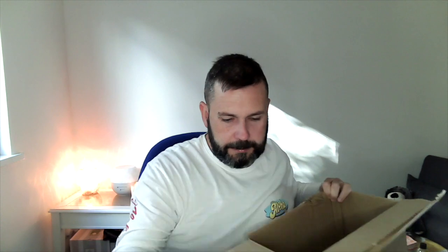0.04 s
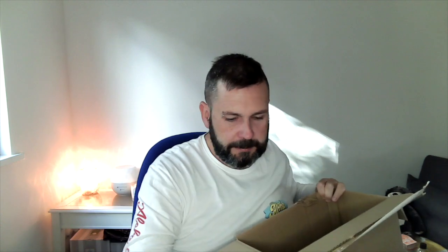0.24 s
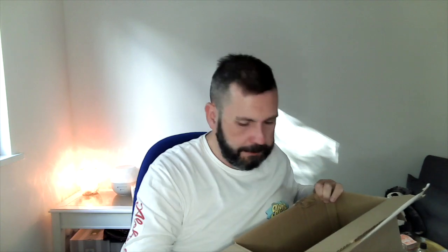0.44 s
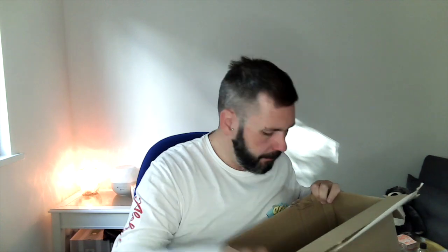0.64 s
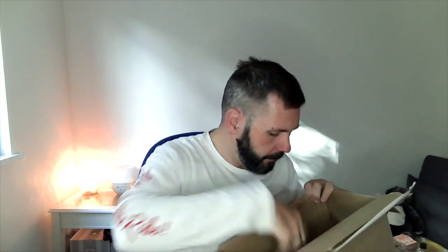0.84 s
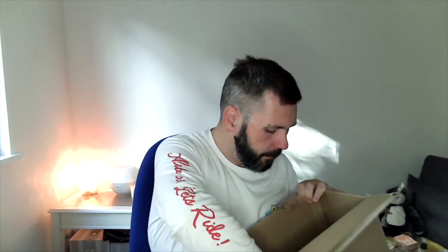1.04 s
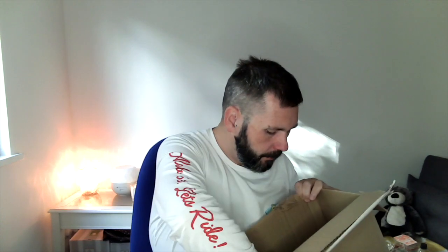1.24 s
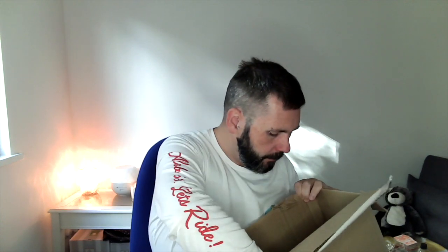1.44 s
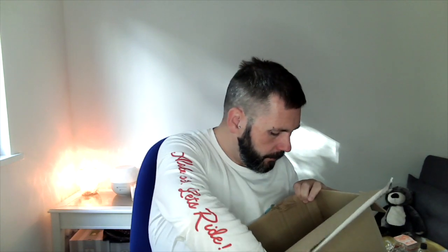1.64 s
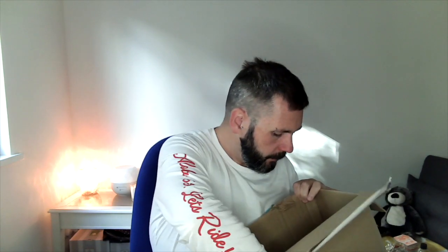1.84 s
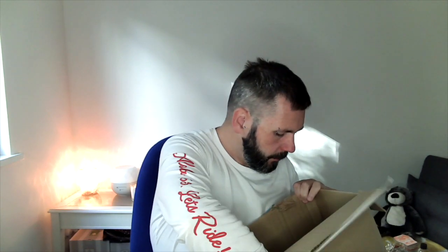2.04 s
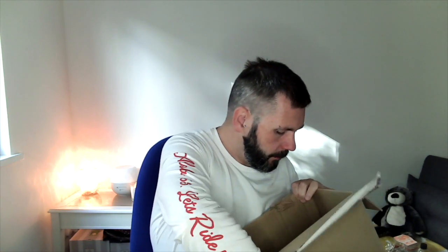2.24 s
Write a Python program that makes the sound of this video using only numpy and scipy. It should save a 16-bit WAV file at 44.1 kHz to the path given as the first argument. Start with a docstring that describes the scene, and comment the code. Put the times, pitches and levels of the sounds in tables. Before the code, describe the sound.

Cardboard box rummaging with rustling packing paper, dull thumps and two early knocks, small room

```python
"""In a small room, two knocks sound on a desk, amid box bumps and rustling paper that begin before them.
Knocks are decaying desk modes under a noise clatter and tick; paper is bursts of random clicks.
Bumps excite the modes of the cardboard box and scuffing noise; a narrow resonance squeaks once.
A low boom and a low hum are narrow-band noise on level curves, over a steady noise floor.
The knocks, paper and bumps gain a diffuse tail that decays at its own speed in each band."""
import sys
import numpy as np
from scipy import signal
from scipy.fft import rfft, irfft
from scipy.io import wavfile
from scipy.ndimage import uniform_filter1d

SR = 44100
rng = np.random.default_rng(int(sys.argv[2]) if len(sys.argv) > 2 else 0)


def generate_wav(sig):
    """Save sig (samples, or channels by samples) to the path in sys.argv[1] as 16-bit PCM at SR."""
    pcm = np.round(np.clip(np.atleast_2d(sig).T, -1, 1) * 32767).astype(np.int16)
    wavfile.write(sys.argv[1], SR, pcm)


N = 101429
TIME = np.arange(N) / SR
HZ = np.fft.rfftfreq(2 * N, 1 / SR)  # bins of the zero-padded transform

# Noise floor spectrum: (frequency [Hz], relative level [dB])
FLOOR_SPECTRUM = [(20, -2), (60, -5), (130, -9), (300, -12), (500, -26), (1000, -31), (3000, -31),
                  (7000, -27.5), (10000, -33), (15000, -47)]
FLOOR_DB = -57

# Level curve of the low hum: (time [s], level [dB])
HUM_LEVELS = [(0, -43), (.11, -40.5), (.16, -47), (.21, -68), (.55, -52), (.66, -70), (.71, -58),
              (.83, -63.5), (.9, -71.5), (2.3, -77)]
HUM_HZ, HUM_WIDTH_HZ = 138, 6.8

# Low boom near 67 Hz, bass tail of the second knock, then the hollow box: (time [s], level [dB])
BOOM_LEVELS = [(0, -48), (.15, -62), (.385, -57), (.415, -39), (.48, -51), (.6, -63.5), (.92, -68),
               (1.0, -58), (1.08, -39.5), (1.2, -51.5), (1.35, -36.5), (1.49, -48), (1.56, -41),
               (1.72, -47), (1.85, -66), (1.93, -56.5), (2.0, -37), (2.12, -47.5), (2.3, -57)]
BOOM_HZ, BOOM_WIDTH_HZ = 67.3, 9.1

SQUEAK_START_S, SQUEAK_RISE_S, SQUEAK_FADE_S = 0.612, 0.02, 0.046  # fade: time to fall 20 dB
SQUEAK_HZ, SQUEAK_WIDTH_HZ, SQUEAK_DB = 647, 15, -51

# Bumps on the box; a fall time under 0.001 s acts as 0.001 s:
# (time [s], level before the ring and scuff trims [dB], rise [s], time to fall 20 dB [s],
#  contact corner [Hz])
BUMPS = [(0.0, -38.5, 0.0082, 0.18, 600), (0.695, -53, .015, .15, 380), (0.94, -42, 0.0058, 0.02, 270),
         (0.971, -35.5, 0.013, 0.08, 276), (0.993, -26, .007, 0.04, 210), (1.114, -39.5, 0.0075, 0.2, 313),
         (1.213, -35.5, 0.0092, 0.08, 375), (1.316, -40.5, 0.0087, 0.37, 270),
         (1.395, -36.5, 0.028, -0.4, 280), (1.526, -38.5, 0.0037, 0.1, 337),
         (1.556, -34, 0.0043, -0.03, 300), (1.624, -38, 0.0037, 0.12, 604), (1.643, -31, 0.0046, 0.04, 380),
         (1.734, -35.5, 0.023, 0.44, 296), (1.771, -28, 0.016, -0.05, 270),
         (1.818, -28.5, 0.015, 0.0749, 650), (1.965, -22, 0.014, .06, 265), (2.022, -29, 0.0046, 0.04, 460)]
# Modes of the cardboard walls and the air inside: (frequency [Hz], level [dB], time to fall 60 dB [s])
BOX_MODES = [(67.3, -11, 0.5), (128.5, 1, 0.32), (186.5, -3.5, 0.24), (254, -4, 0.12), (293.3, -4, .13),
             (342, -23, 0.16), (443, -12.5, 0.2), (689.3, -4.5, 0.12)]
# Spectrum of scuffing along the walls: (frequency [Hz], relative level [dB])
SCUFF_SPECTRUM = [(25, -25), (50, -16), (68, 0), (95, -10), (130, 1.5), (180, -3), (280, -2), (420, -9),
                  (560, -14), (900, -9.5), (3000, -40.5)]
BOX_RING_DB, SCUFF_DB, BOX_ROOM_DB = -2, -2, -13

# Knocks on the desk:
# (time [s], mode level [dB], contact corner [Hz], clatter level [dB], tick level [dB],
#  extra level of the low modes [dB])
KNOCKS = [(0.2002, -9, 520, -19.5, -41, 7), (0.3965, .5, 2800, -14.5, -34, -5)]
# Modes of desk and object: (frequency [Hz], level [dB], time to fall 60 dB [s])
DESK_MODES = [(131.6, -19, .15), (257.7, -25, .08), (323.6, -18.5, 0.12), (457, -18, 0.094),
              (522.5, -12.5, 0.11), (689, -17, .06), (738, -12.5, .1), (880, -25, .07), (1096, -31.5, .09),
              (1253, -32, .1), (1468, -31, .1), (1542, -29, .1), (2124, -31.5, .09), (2247, -27.5, .08)]
# Clatter spectrum before the contact softens it: (frequency [Hz], relative level [dB])
CLATTER_SPECTRUM = [(40, -17), (90, 4.5), (190, -5), (290, 2), (420, -1.5), (720, -4), (1000, -13.5),
                    (1600, -13), (1850, -22), (2250, -16.5), (2700, -26), (3400, -19), (4500, -28.5),
                    (12000, -61)]
LOW_MODES_HZ, KNOCK_RISE_S, KNOCK_ROOM_DB = 400, 0.0028, -12
CLATTER_FADE_S, TICK_FADE_S = 0.042, 0.025  # times to fall 20 dB

# Bursts of crumpling paper; a fall time under 0.001 s acts as 0.001 s:
# (start [s], rise [s], time to fall 20 dB [s], crisp level [dB], crinkle level [dB], dull level [dB])
CRUMPLES = [(0.0, 0.0017, 0.09, -50, -62, -52.5), (0.03, 0.01, 0.9, -67, -68.5, -64.5),
            (0.139, 0.096, 0.27, -51, -54, -68), (0.24, .05, 0.38, -54, -64, -59),
            (0.315, 0.024, 0.16, -47.5, -51.5, -49), (0.576, .028, 0.12, -49.5, -72, -61),
            (0.606, 0.025, 0.0259, -40.5, -66, -50.5), (0.701, 0.063, -0.02, -61, -84, -67.5),
            (0.768, 0.02, 0.02, -49, -57, -50), (0.796, 0.0209, -0.1, -53, -61.5, -55),
            (0.933, 0.0055, 0.08, -39.5, -49, -47), (0.981, 0.017, -0.0056, -51, -54, -41.5),
            (1.017, .005, 0.0546, -45.5, -48, -45.5), (1.11, 0.0081, 0.3, -52.5, -57, -55.5),
            (1.15, .01, -0.22, -47, -59, -42), (1.216, 0.015, 0, -54, -53, -49),
            (1.248, 0.0033, 0.5, -56.5, -60.5, -58), (1.31, 0.0095, 0.06, -52.5, -53, -45),
            (1.358, 0.024, 0.09, -46, -52, -45), (1.524, 0.002, 0.12, -48, -55, -48.5),
            (1.56, .005, 0.13, -53, -68, -52.5), (1.625, 0.00084, 0.12, -49, -60, -43),
            (1.65, 0.017, -0.13, -47.5, -54, -48), (1.729, 0.0044, 0.0645, -33.5, -39, -39),
            (1.759, 0.0044, -0.04, -38, -47, -40), (1.809, 0.0076, 0.16, -65, -58, -44),
            (1.8367, 0.00085, 0.0552, -29, -35, -35.5), (1.953, .002, .07, -41, -45, -41),
            (2.001, 0.0067, 0.105, -39.5, -43.5, -46.5), (2.071, 0.0069, 0.2, -53.5, -55, -46.5),
            (2.174, 0.016, 2, -48, -52.5, -57.5), (2.218, 0.031, 1, -43, -44, -41.5)]
# Spectrum of small snapping creases, also used for the ticks: (frequency [Hz], relative level [dB])
CRISP_SPECTRUM = [(300, -47), (1500, -19.5), (2800, -15), (4200, -4.5), (5200, -0.5), (6500, 0.5),
                  (8300, -4), (10000, -7), (11500, -17), (13000, -35), (16000, -48)]
# Spectrum of larger crinkling creases: (frequency [Hz], relative level [dB])
CRINKLE_SPECTRUM = [(300, -39.5), (1400, -14), (2200, -1.5), (2800, -0.5), (3400, 1), (4200, -6.5),
                    (6000, -15), (12000, -43.5)]
# Spectrum of big, dull folds: (frequency [Hz], relative level [dB])
DULL_SPECTRUM = [(100, -16.5), (400, 0), (560, -6.5), (700, 2.5), (900, -4.5), (1150, 2), (1550, -3),
                 (1850, -5), (2250, -7.5), (2800, -19.5), (4500, -27), (12000, -49.5)]
CREASES_PER_S, CREASE_SPREAD_DB, PAPER_ROOM_DB = 2200, 4.2, 0.5
PATCH_DB, PATCH_HZ, PATCH_S = 2.5, 750, 0.035  # rms depth, width and duration of the colour patches

# Reverberation of the room: (frequency [Hz], time to fall 60 dB [s])
ROOM_T60 = [(100, 0.31), (500, 0.27), (1500, 0.28), (4000, 0.33), (8000, 0.27), (14000, 0.087)]
# Likeness of the two channels: (frequency [Hz], left-right correlation [-1 to 1])
ROOM_LIKENESS = [(100, 0.99), (500, 0.96), (1000, 0.83), (2000, 0.44), (4000, -0.51), (8000, -0.24)]
# Unlikeness of the two microphones: (frequency [Hz], left minus right level [dB])
MIC_BALANCE = [(300, 0), (1200, 2), (2800, -1), (5500, 2.3), (9000, -3), (14000, -1.5)]
LEFT_LEAD_S, BAND_EDGE_HZ = 3e-5, 15700
MIC_OFFSET = -0.0074  # constant, full scale = 1


def amp(db):
    """Decibel law: converts a level to an amplitude ratio."""
    return 10 ** (np.asarray(db) / 20)


def unit(x):
    """Power normalization: scales to rms 1."""
    return x / np.sqrt(np.mean(x ** 2) + 1e-20)


def read(points, hz):
    """Logarithmic pitch scale: interpolates a table over log frequency."""
    f, value = np.transpose(points)
    return np.interp(np.log(hz + 1), np.log(f), value)


def add(mix, s, sound):
    """Superposition: sums a sound into the mix from a time in seconds."""
    part = mix[max(round(s * SR), 0):][:len(sound)]
    part += sound[:len(part)]


def soften(hz, corner_hz):
    """Contact low-pass: a soft contact excites little above its corner."""
    return 1 / np.sqrt(1 + np.square(np.square(hz / corner_hz)))


def burst(start, rise, fade):
    """Exponential decay: a linear rise, then a fall of 20 dB in each fade time."""
    t = TIME - start
    attack = np.clip(t / max(rise, 1e-4), 0, 1)
    decay = amp(-20 * np.maximum(t - rise, 0) / max(fade, 1e-3))
    return attack * decay


def steady(x, size):
    """Short-time power normalization: evens out the slow swings of a noise."""
    return x / np.sqrt(np.abs(uniform_filter1d(x ** 2, size)) + 1e-9)


def colour(x, points, gain=1):
    """Minimum-phase filtering: a causal response of unit power with the given spectrum."""
    magnitude = unit(amp(read(points, HZ)) * gain)
    cepstrum = irfft(np.log(np.maximum(magnitude, 1e-5)))
    # folding the cepstrum onto positive times makes the filter causal
    cepstrum[1:N] *= 2
    cepstrum[N + 1:] = 0
    response = np.exp(rfft(cepstrum))
    return irfft(rfft(x, 2 * N) * response)[..., :N]


def narrow(hz, width_hz):
    """Resonant filtering: noise in a narrow band wavers, here held to an even level."""
    spectrum = rfft(rng.standard_normal(2 * N)) * soften(HZ - hz, width_hz)
    return steady(unit(irfft(spectrum)[:N]), size=2500)


def drone(levels, hz, width_hz):
    """Amplitude modulation: a narrow resonance follows a level curve."""
    return narrow(hz, width_hz) * amp(np.interp(TIME, *np.transpose(levels)))


def ring(modes, gains):
    """Modal superposition: sums decaying sinusoids of alternating sign over half a second."""
    t = TIME[:SR // 2]
    total = np.zeros(len(t))
    for k, ((hz, db, t60), gain) in enumerate(zip(modes, gains)):
        decay = amp(db - 60 * t / t60)
        total += (-1) ** k * gain * decay * np.sin(2 * np.pi * hz * t)
    return total


def pair(two):
    """Spatial coherence: mixes unrelated signals to the left-right correlation of each band."""
    a, b = rfft(two, 2 * N)
    same = np.clip(read(ROOM_LIKENESS, HZ), -1, 1)
    mid = a * np.sqrt((1 + same) / 2)
    side = b * np.sqrt((1 - same) / 2)
    return irfft(np.array([mid + side, mid - side]))[:, :N]


def room(x, wet_db):
    """Diffuse reverberation: direct sound plus a noise tail that decays at its own speed in each band."""
    hz, t, z = signal.stft(rng.standard_normal((2, SR // 2)), SR, nperseg=256)
    decay = amp(-60 * t / read(ROOM_T60, hz)[:, None])
    tail = signal.istft(z * decay, SR, nperseg=256)[1]
    tail *= np.clip(TIME[:tail.shape[1]] / 0.0006, 0, 1)  # rises over 0.6 ms
    tail /= np.linalg.norm(tail[0])
    wet = pair(signal.fftconvolve(x[None], tail, axes=1)[:, :N])
    return (x + amp(wet_db) * wet) / np.hypot(1, amp(wet_db))


def creases():
    """Impulsive buckling: a dense random train of tiny clicks of very uneven size."""
    size = amp(CREASE_SPREAD_DB * np.minimum(rng.exponential(1, N), 5))
    sign = rng.choice([-1, 1], N)
    happens = rng.random(N) < CREASES_PER_S / SR
    return steady(size * sign * happens, size=700)


def colour_patches(x):
    """Time-varying filtering: random drifting patches of colour make the crackle uneven."""
    z = signal.stft(x, SR, nperseg=512, noverlap=384)[2]
    bins, frames = max(round(PATCH_HZ * 512 / SR), 1), max(round(PATCH_S * SR / 128), 1)
    patches = uniform_filter1d(rng.standard_normal(z.shape), bins, axis=0)
    patches = unit(uniform_filter1d(patches, frames, axis=1))
    gain = unit(amp(PATCH_DB * patches))
    return signal.istft(z * gain, SR, nperseg=512, noverlap=384)[1][:N]


def noise_floor():
    """Stationary noise: two partly correlated channels share a fixed spectrum."""
    return amp(FLOOR_DB) * pair(colour(rng.standard_normal((2, N)), FLOOR_SPECTRUM))


def hum():
    """Narrow-band noise: a low hum wavers about one frequency on a level curve."""
    return drone(HUM_LEVELS, HUM_HZ, HUM_WIDTH_HZ)


def boom():
    """Low resonance: narrow-band noise gives the second knock's bass tail, then the hollow box."""
    return drone(BOOM_LEVELS, BOOM_HZ, BOOM_WIDTH_HZ)


def squeak():
    """Frictional resonance: rubbed cardboard sings for a moment in a narrow band."""
    envelope = burst(SQUEAK_START_S, SQUEAK_RISE_S, SQUEAK_FADE_S)
    return amp(SQUEAK_DB) * narrow(SQUEAK_HZ, SQUEAK_WIDTH_HZ) * envelope


def box_bumps():
    """Modal excitation and friction: each bump rings the box and scuffs along its walls."""
    out = np.zeros(N)
    mode_hz = np.array(BOX_MODES)[:, 0]
    scuff_hz = np.arange(SR // 2 + 1)  # one second of noise has bins 1 Hz apart
    for s, db, rise, fade, dull_hz in BUMPS:
        modes = ring(BOX_MODES, soften(mode_hz, dull_hz))
        modes *= np.minimum(TIME[:len(modes)] / rise, 1)
        add(out, s, amp(db + BOX_RING_DB) * modes)

        tone = amp(read(SCUFF_SPECTRUM, scuff_hz)) * soften(scuff_hz, dull_hz)
        scuff = irfft(rfft(rng.standard_normal(SR), SR) * tone)
        scuff = steady(unit(scuff), size=900) * burst(0, rise, fade)[:len(scuff)]
        add(out, s, amp(db + SCUFF_DB) * scuff)
    return room(out, BOX_ROOM_DB)


def knock_ticks():
    """Contact noise: bright random clicks accompany each knock."""
    level = np.zeros(N)
    for s, _, _, _, tick_db, _ in KNOCKS:
        level += amp(tick_db) * burst(s, 0.00086, TICK_FADE_S)
    return room(colour(creases() * level, CRISP_SPECTRUM), PAPER_ROOM_DB)


def knocks():
    """Modal excitation: each knock rings desk and object, with a brief noise clatter on top."""
    out = np.zeros(N)
    mode_hz = np.array(DESK_MODES)[:, 0]
    for s, db, dull_hz, clatter_db, _, low_db in KNOCKS:
        low_gain = amp(low_db * (mode_hz < LOW_MODES_HZ))
        modes = ring(DESK_MODES, soften(mode_hz, dull_hz) ** 0.88 * low_gain)
        modes *= np.minimum(TIME[:len(modes)] / KNOCK_RISE_S, 1)
        add(out, s, amp(db) * modes)

        contact = np.sqrt(soften(HZ, dull_hz))  # gentler slope than for the modes
        clatter = steady(colour(rng.standard_normal(N), CLATTER_SPECTRUM, contact), size=400)
        out += amp(clatter_db) * clatter * burst(s, KNOCK_RISE_S, CLATTER_FADE_S)
    return room(out, KNOCK_ROOM_DB)


def paper():
    """Buckling at three scales: small creases snap, larger ones crinkle, big folds crackle dully."""
    shapes = np.array([burst(*row[:3]) for row in CRUMPLES])
    gains = amp(np.array(CRUMPLES)[:, 3:]).T
    levels = np.sqrt(gains ** 2 @ shapes ** 2)  # overlapping bursts add in power
    out = np.zeros(N)
    for level, spectrum in zip(levels, (CRISP_SPECTRUM, CRINKLE_SPECTRUM, DULL_SPECTRUM)):
        out += colour(colour_patches(creases()) * level, spectrum)
    return room(out, PAPER_ROOM_DB)


def scene():
    """Superposition: sums the sources from the background to the paper."""
    background = noise_floor() + hum() + boom()
    contacts = squeak() + box_bumps() + knock_ticks() + knocks()
    return background + contacts + paper()


def record(dry):
    """Stereo reception: two slightly unlike microphones, the left a little nearer, band-limited and offset."""
    tilt = amp(read(MIC_BALANCE, HZ) / 2)
    lead = np.exp(2j * np.pi * HZ * LEFT_LEAD_S)
    responses = np.array([tilt * lead, 1 / tilt])
    heard = irfft(rfft(dry, 2 * N) * responses)[:, :N]
    low_pass = signal.firwin(511, BAND_EDGE_HZ, window=("kaiser", 9), fs=SR)
    return signal.oaconvolve(heard, low_pass[None], "same") + MIC_OFFSET


dry = scene()
out = record(dry)
generate_wav(out)
```